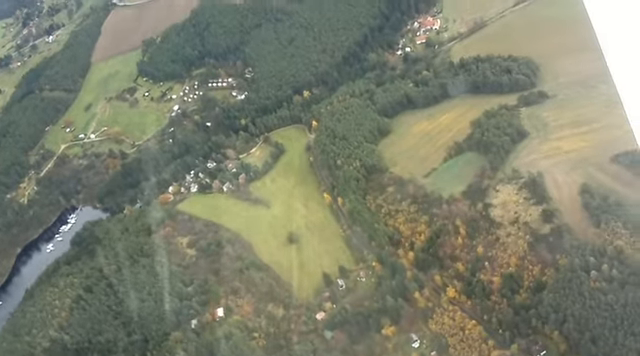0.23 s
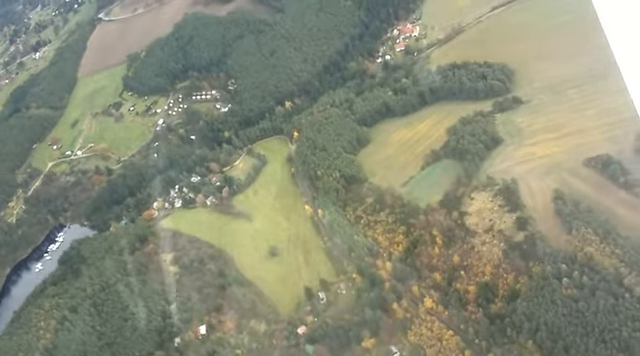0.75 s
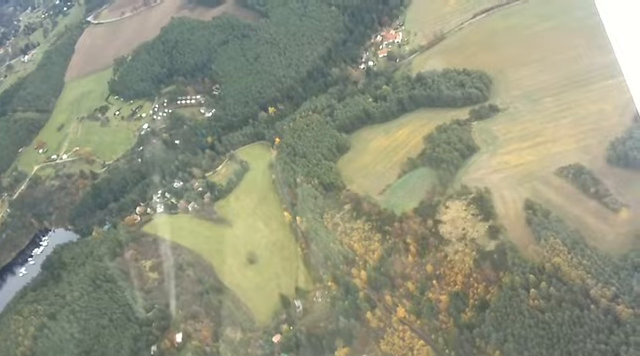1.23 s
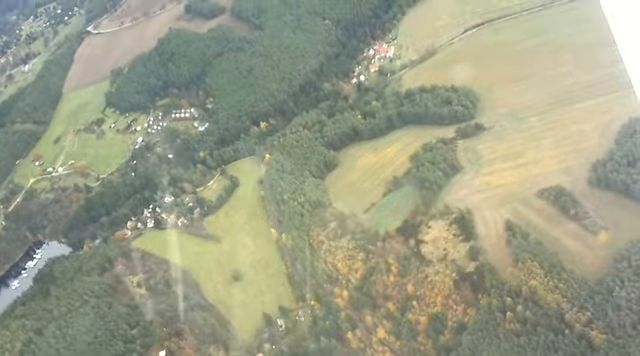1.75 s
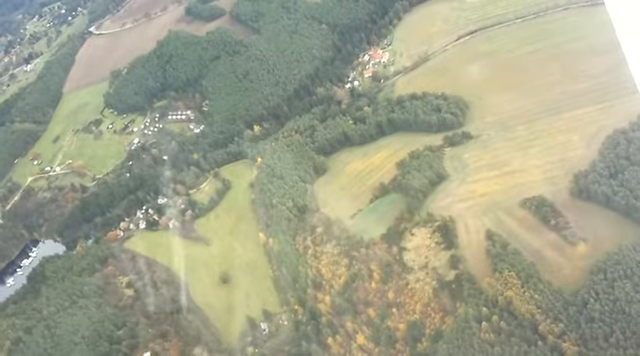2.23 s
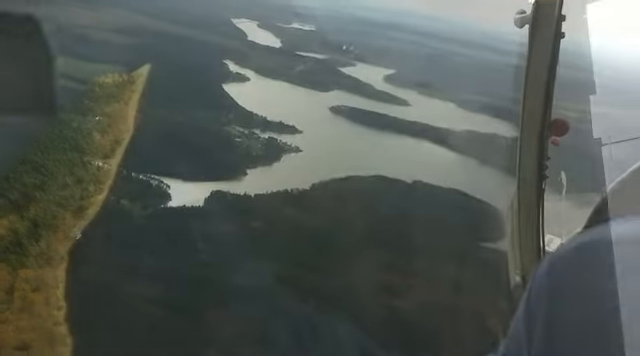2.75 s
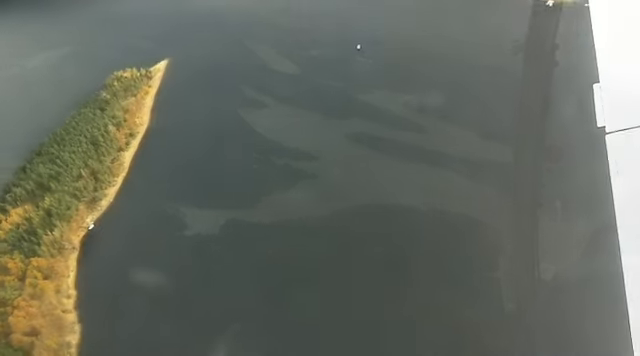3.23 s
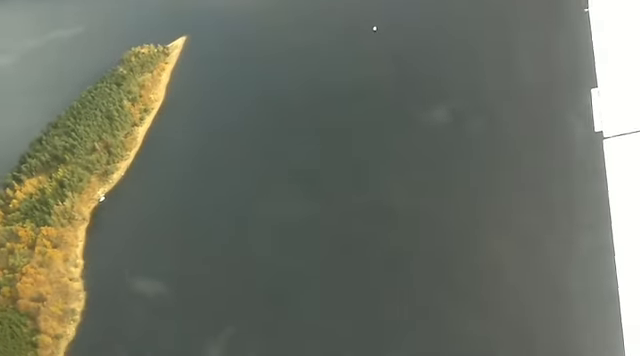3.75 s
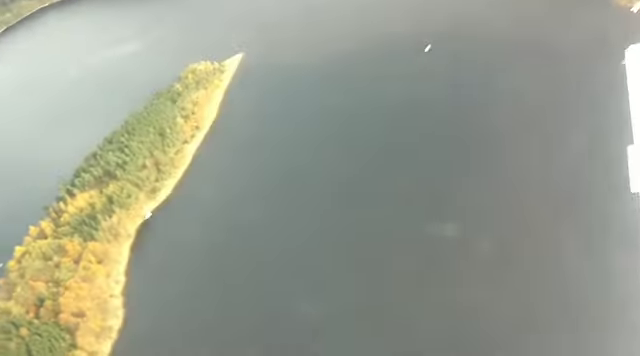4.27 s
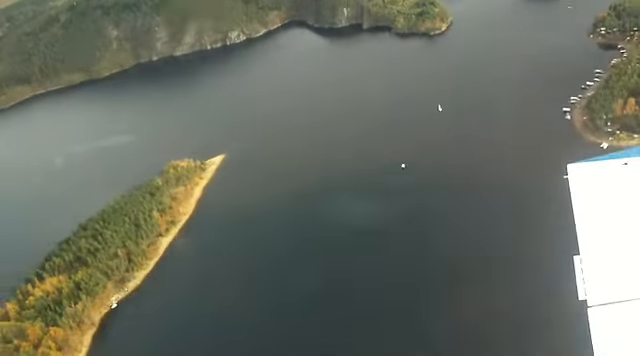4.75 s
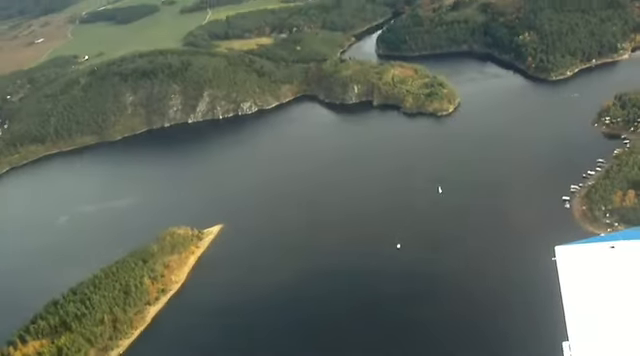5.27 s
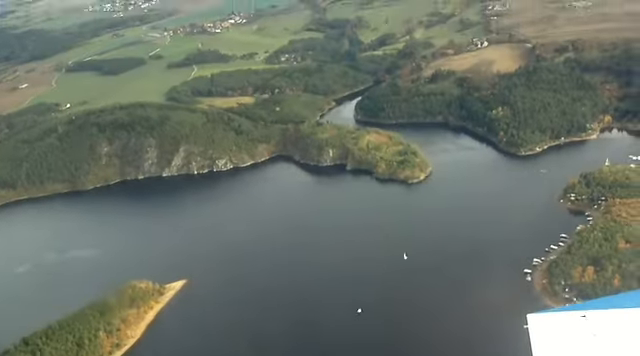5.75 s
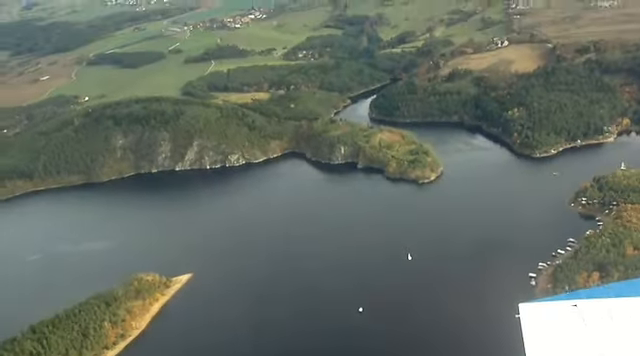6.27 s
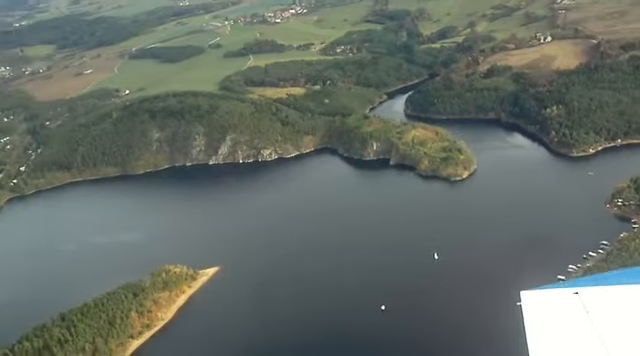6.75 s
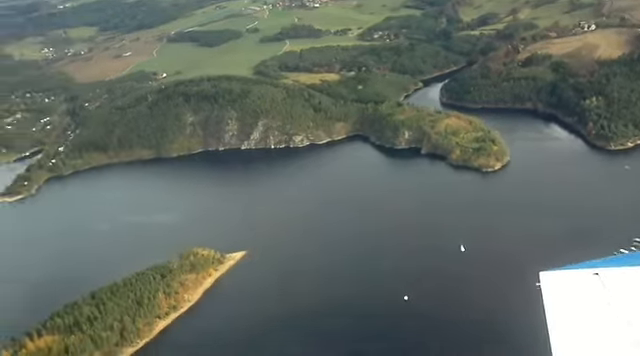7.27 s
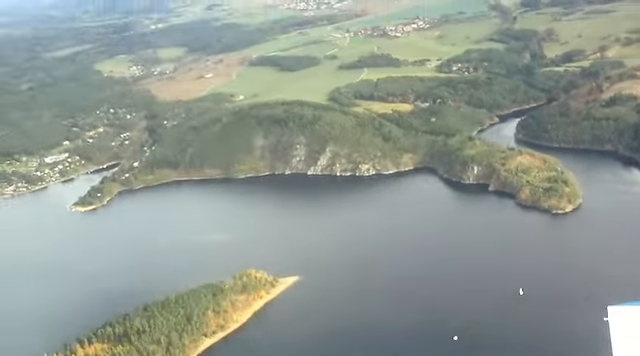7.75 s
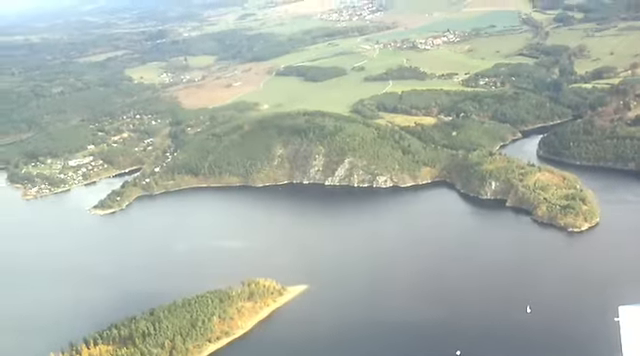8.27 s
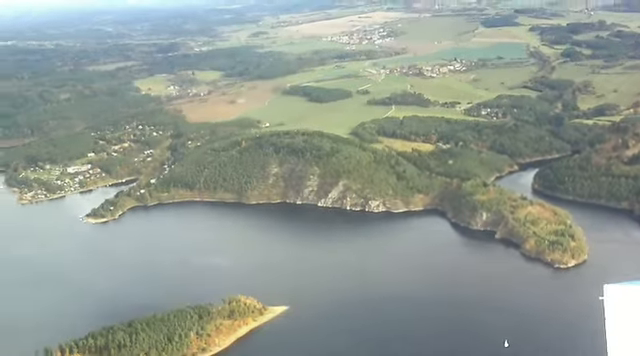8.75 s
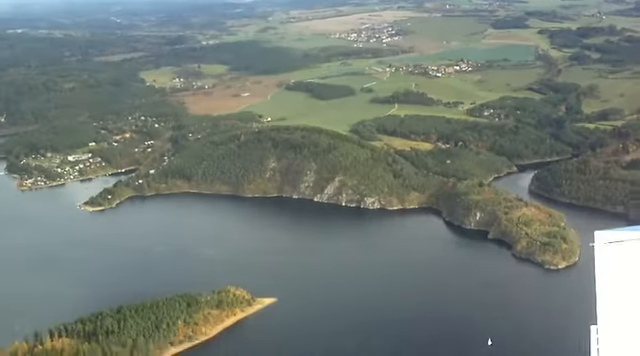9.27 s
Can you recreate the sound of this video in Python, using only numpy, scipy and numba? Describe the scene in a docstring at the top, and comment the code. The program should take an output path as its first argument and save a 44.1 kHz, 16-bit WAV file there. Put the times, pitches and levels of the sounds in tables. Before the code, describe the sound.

Inside a light piston aircraft in cruise, a deep steady propeller hum dominates over low airframe rumble and a fainter rush of air. After a couple of seconds it stops abruptly with a soft thump. A short rattly knock on the handheld camera follows, with duller roar fading away as the drone swells back, then continues unchanged to the end. Close cabin microphone, loud and compressed.

```python
"""Cabin of a light piston aircraft in cruise, three shots edited together.
A three-blade propeller hums on the third shaft order over weaker engine orders: one sine per order.
Shaped noise gives slipstream roar on the skin and low airframe rumble; gain control ducks each shot.
The first shot is cut off with a soft thump, the third fades in from silence;
a short second shot drops in with a knock and fades out."""
import sys
import numpy as np
from scipy import signal
from scipy.fft import rfft, irfft, next_fast_len
from scipy.io import wavfile
from scipy.ndimage import uniform_filter1d
from numba import njit

SR = 44100
rng = np.random.default_rng(int(sys.argv[2]) if len(sys.argv) > 2 else 0)


def dump_mix(stems):
    """Bounce the given channels to the path in sys.argv[1] as a 16-bit WAV at rate SR."""
    frames = np.atleast_2d(stems).T  # one column per channel
    limited = np.clip(frames, -1, 1)  # hard clip at full scale
    pcm = np.round(limited * 32767).astype(np.int16)
    wavfile.write(sys.argv[1], SR, pcm)


def volts_from_db(level):
    """Convert decibel levels to linear amplitude ratios."""
    exponent = np.asarray(level, float) / 20
    return 10 ** exponent


N = 419391
TIME = np.arange(N) / SR
BLADES = 3


def level(x, rms_db):
    """Scale to an rms level."""
    return x * volts_from_db(rms_db) / np.sqrt(np.mean(x ** 2))


def curve(rows):
    """Join (time_s, value) rows by straight lines."""
    return np.interp(TIME, *np.transpose(rows))


def walk(rate_hz):
    """Random levels held 1 / rate_hz and slewed twice; spread near 1."""
    hold = int(SR / rate_hz)
    steps = np.repeat(rng.standard_normal(N // hold + 1), hold)
    return 1.29 * uniform_filter1d(uniform_filter1d(steps, hold), hold)[:N]


def colour(x, spectrum):
    """Filter a noise by (freq_hz, gain_db) points, straight over log frequency."""
    freq_hz, gain_db = np.transpose(spectrum)
    size = next_fast_len(N)
    bin_hz = np.maximum(np.arange(size // 2 + 1) * SR / size, 1)
    gain = volts_from_db(np.interp(np.log(bin_hz), np.log(freq_hz), gain_db))
    return irfft(rfft(x, size) * gain, size)[:N]


def engine(orders, shaft, rough=0.99):
    """One sine per shaft order; the blade tone is steadiest, the others waver as firings vary."""
    tones = 0
    for order, level_db in orders:
        blade_tone = abs(order - BLADES) < .1
        sway_db = 0.64 * walk(4.4) if blade_tone else 3.45 * rough * walk(6)
        slip_rad = 0.12 * walk(6.7) if blade_tone else 1.11 * rough * walk(11)
        phase = order * shaft + slip_rad + rng.uniform(0, 2 * np.pi)
        tones = tones + volts_from_db(level_db + sway_db) * np.sin(phase)
    return tones


def flicker(x):
    """Narrow time-frequency patches weaken for a moment, most often above 10 kHz."""
    # share of patches at their weakest: freq_hz, share (0-1)
    dropout = [(2000, 0), (7000, 0.03), (10000, 0), (12500, .45), (15500, 0.5)]
    freq_hz, _, cells = signal.stft(x, SR, nperseg=2048)
    bins = 3  # patch height
    chance = rng.random((len(freq_hz) // bins + 1, cells.shape[1]))
    chance = np.repeat(chance, bins, axis=0)[:len(freq_hz)]
    share = np.interp(freq_hz, *np.transpose(dropout))[:, None]
    kept = np.clip((chance - share) / 0.089, .03, 1)
    kept = kept / np.sqrt(np.mean(kept ** 2, axis=1, keepdims=True))  # average power unchanged
    return signal.istft(cells * kept, SR, nperseg=2048)[1][:N]


def slipstream(shaft):
    """White turbulence: gusts, quick buffeting and a slight throb from the propeller wash."""
    # slow change of the airflow: time_s, level_db (relative)
    airflow = [(0, -1), (2.4, -0.5), (6, 0.6), (8.5, .7), (9.51, -1.1)]
    throb_db = 0.51 * np.sin(BLADES * shaft) + 0.47 * np.sin(2 * BLADES * shaft)
    throb_db += 0.49 * np.sin(shaft) + 0.62 * np.sin(1.5 * shaft)
    gust_db = curve(airflow) + 0.43 * walk(16) + 0.74 * walk(60)
    return flicker(volts_from_db(gust_db + throb_db) * rng.standard_normal(N))


def turning_roar(air):
    """Roar through the skin as the camera turns from looking down towards looking ahead."""
    # roar spectra, down and ahead: freq_hz, gain_db (relative)
    roar_down, roar_ahead = [(320, -15), (550, -2.5), (910, -4.5), (1250, -6.5), (1670, -3.5), (2150, -9.5),
                             (2540, -15.5), (3170, -20.5), (5190, -21.5), (7160, -25), (8710, -31),
                             (11000, -29.5), (13200, -36), (14500, -33), (15700, -42)], [(320, -39), (550, 0), (886, -1.5), (1220, -3),
                                                      (1400, 0.5), (1650, 0.5), (2100, -5.5), (2760, -11),
                                                      (4380, -14.5), (6960, -23.5), (8710, -21.5),
                                                      (11500, -32.5), (13200, -38), (14600, -31),
                                                      (15700, -32)]
    # weight of the ahead spectrum: time_s, share (0-1)
    turn_rows = [(3.9, 0.02), (5.1, 0.6)]
    turn = curve(turn_rows)
    return (1 - turn) * level(colour(air, roar_down), 0) + turn * level(colour(air, roar_ahead), 0)


def airframe_rumble():
    """Low noise of the airframe with a slight unsteadiness."""
    # rumble spectrum: freq_hz, gain_db (relative)
    rumble_spectrum = [(8, -44), (20, -13.5), (40, -0.5), (80, -1.5), (130, 2), (200, -1), (300, -6.5),
                       (420, -10), (560, -20.5), (900, -61), (2000, -110)]
    return colour(volts_from_db(0.48 * walk(25)) * rng.standard_normal(N), rumble_spectrum)


@njit
def squeeze(x, top, attack, release, power):
    """Gain control: follows the peaks and turns down what exceeds the top."""
    y, envelope = np.empty(len(x)), top
    for i in range(len(x)):
        size = abs(x[i])
        envelope += (size - envelope) * (attack if size > envelope else release)
        y[i] = x[i] * min(1., top / envelope) ** power
    return y


def shot(tones, roar, tones_db, rumble_db, roar_db):
    """Mix of one shot; the camera's gain control ducks everything at and after each loud peak."""
    mix = np.sqrt(2) * volts_from_db(tones_db) * tones + level(airframe_rumble(), rumble_db) + level(roar, roar_db)
    attack_s, release_s = 0.0017, 0.017
    return squeeze(mix, 0.58, 1 / (attack_s * SR), 1 / (release_s * SR), 0.76)


def knocks():
    """Rattle of the camera housing: short scrapes of noise, heard directly and ringing its modes."""
    # scrapes: start_s, level_db (relative)
    scrapes = [(2.560, -22), (2.564, -10.5), (2.567, -8.5), (2.57, -10), (2.584, -18), (2.589, -15.5)]
    # housing modes: pitch_hz, t60_s, level_db (relative)
    housing = [(367, 0.054, 0), (950, 0.012, -2), (1550, 0.026, -2.5), (2240, 0.0095, -5.5)]
    push = np.zeros(N)
    t = np.arange(int(.02 * SR)) / SR
    for start_s, level_db in scrapes:
        i = int(start_s * SR)
        push[i:i + len(t)] += volts_from_db(level_db) * np.exp(-t / 0.0021) * rng.standard_normal(len(t))
    t = np.arange(int(.15 * SR)) / SR
    body = 0
    for pitch_hz, t60_s, level_db in housing:
        decay = np.exp(-np.log(1000) * t / t60_s)
        body = body + volts_from_db(level_db) * np.sin(2 * np.pi * pitch_hz * t) * decay
    direct = signal.sosfilt(signal.butter(2, 5500., fs=SR, output="sos"), push)
    return volts_from_db(-18.5) * signal.fftconvolve(push, body)[:N] + volts_from_db(-3.0) * direct


def ramp(start_s, end_s):
    """Straight rise from 0 to 1."""
    return np.clip((TIME - start_s) / (end_s - start_s), 0, 1)


def splice(cut_s):
    """A cut: 0 before, 1 after, over a 2 ms ramp."""
    return ramp(cut_s - .001, cut_s + .001)


def fall(start_s, decay_s):
    """1 until start_s, then exponential decay, to 1 / e in decay_s."""
    return np.exp(-np.maximum(TIME - start_s, 0) / decay_s)


def scene():
    """Three shots of the same cabin joined by a cut and a crossfade."""
    # engine orders per shot: order (multiple of shaft speed), level_db (relative)
    orders_first, orders_second = [(1, -22), (1.5, -16), (2, -15.5), (3, 0.5), (4, -17), (4.5, -20),
                                   (5, -23), (6, -24.5), (7.5, -25), (8, -23), (9, -25.5), (10.5, -32.5)], [(2, 4), (4.5, -0.5), (6, -8.5), (8, -14)]
    orders_third = [(1, -24), (1.5, -19.5), (2, -17.5), (3, 0), (4, -16.5), (4.5, -17.5), (5, -20),
                    (6, -32.5), (7.5, -30.5), (8, -22.5), (9, -30), (9.5, -33.5), (10.5, -33.5),
                    (12, -34.5)]
    # roar through the skin: freq_hz, gain_db (relative)
    roar_first, roar_second = [(320, -9.5), (550, -4.5), (700, -5), (940, -4.5), (1280, -8), (1470, -5.5),
                               (1690, -8.5), (2100, -6), (2350, -12.5), (2700, -16), (3500, -21.5),
                               (7470, -24.5), (10000, -33), (12700, -34), (15700, -45)], [(320, -30), (550, -1.5), (688, -2), (803, -10.5),
                                                   (1160, -6), (1890, -10), (2110, -15), (4200, -17),
                                                   (8710, -24.5), (15700, -45)]
    # one row per shot, ahead of gain control: tones_db, rumble_db, roar_db
    shot_levels = [(-9.5, -15, -26), (-16.5, -15, -24.5), (-9, -15.5, -26.5)]
    blade_hz = 121.58
    cut_s, second_in_s, fade_end_s = 2.364, 2.558, 3.2
    shaft = 2 * np.pi * blade_hz / BLADES * TIME  # rad

    first_roar = colour(slipstream(shaft), roar_first)
    first = shot(engine(orders_first, shaft), first_roar, *shot_levels[0])
    # the second shot's tones die away ahead of its roar
    second_tones = engine(orders_second, shaft, rough=0.85) * fall(second_in_s, 0.62)
    second = shot(second_tones, colour(slipstream(shaft), roar_second), *shot_levels[1]) + knocks()
    third = shot(engine(orders_third, shaft), turning_roar(slipstream(shaft)), *shot_levels[2])

    # faint roar lingers 19 ms after the cut, 9 dB below the first shot's setting
    linger = (splice(cut_s) - splice(cut_s + .019)) * level(first_roar, shot_levels[0][2] - 9)
    thump = -volts_from_db(-19) * splice(cut_s) * fall(cut_s, .006)
    # exponents bend the fades; 1 = straight
    fade_out = splice(second_in_s) * (1 - ramp(second_in_s, fade_end_s)) ** 0.86
    fade_in = ramp(cut_s, fade_end_s) ** 1.13
    mix = (1 - splice(cut_s)) * first + linger + thump + fade_out * second + fade_in * third
    return mix[None]


def roll_off(x):
    """The treble ends steeply here."""
    return signal.sosfilt(signal.butter(12, 16110, fs=SR, output="sos"), x)


def record(dry):
    """Steep low-pass at 15.72 kHz, then peaks clip at full scale."""
    dull = signal.sosfilt(signal.ellip(14, .5, 90, 15720, fs=SR, output="sos"), dry)
    mix = np.clip(dull, -1, 1)
    return roll_off(mix)


dry = scene()
out = record(dry)
dump_mix(out)
```